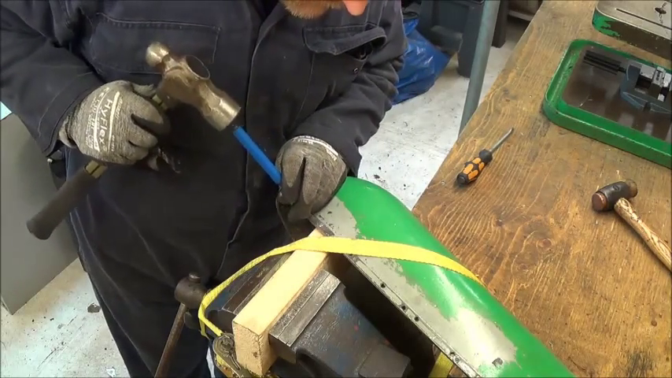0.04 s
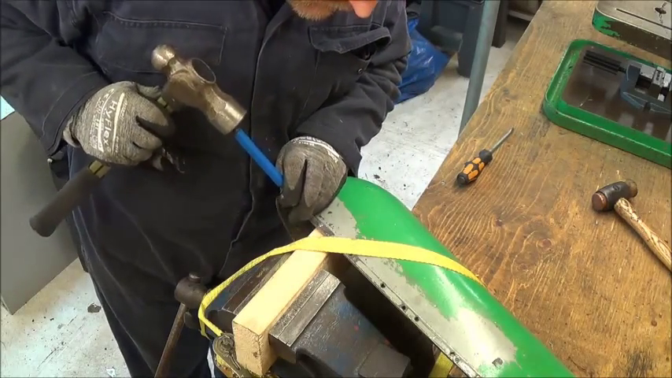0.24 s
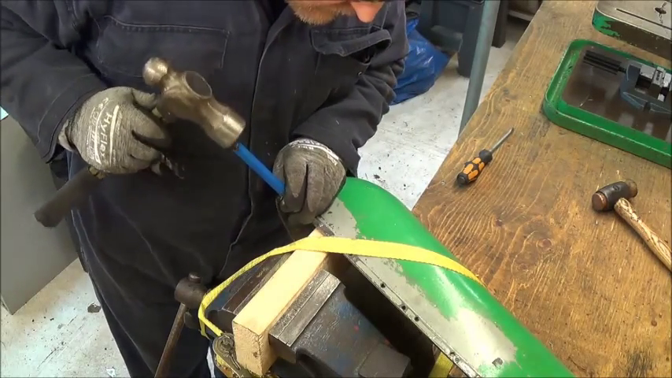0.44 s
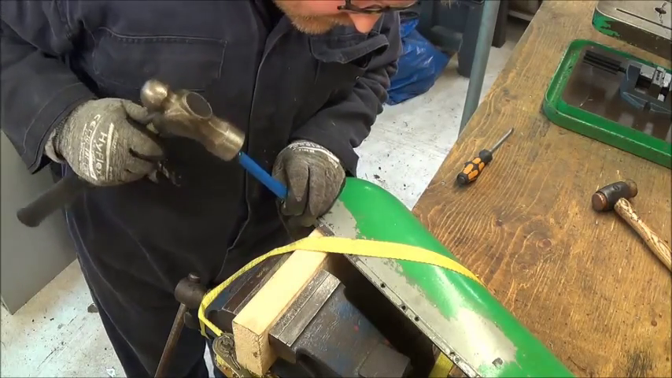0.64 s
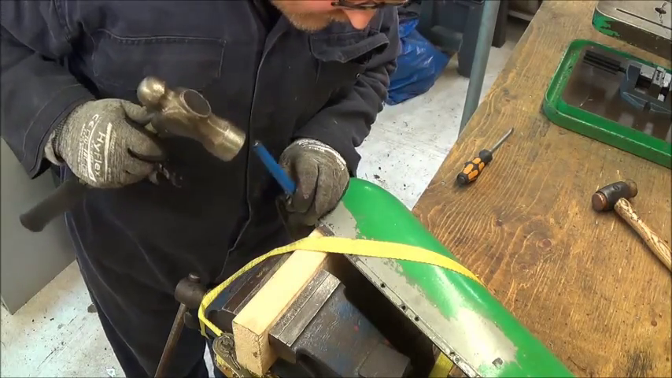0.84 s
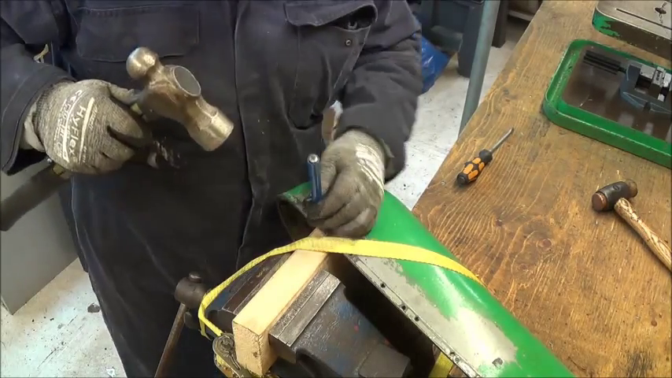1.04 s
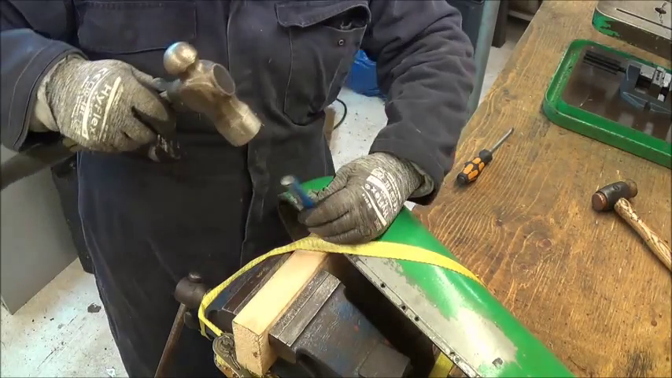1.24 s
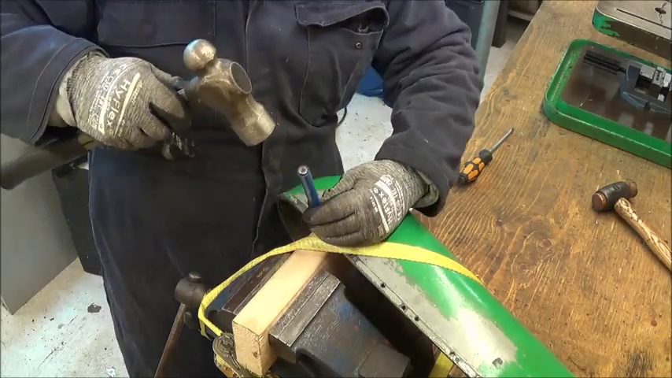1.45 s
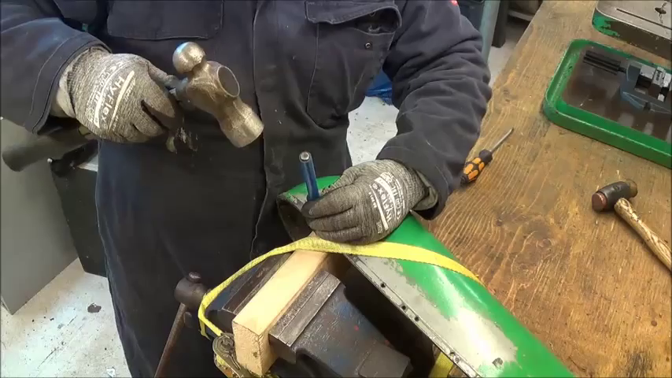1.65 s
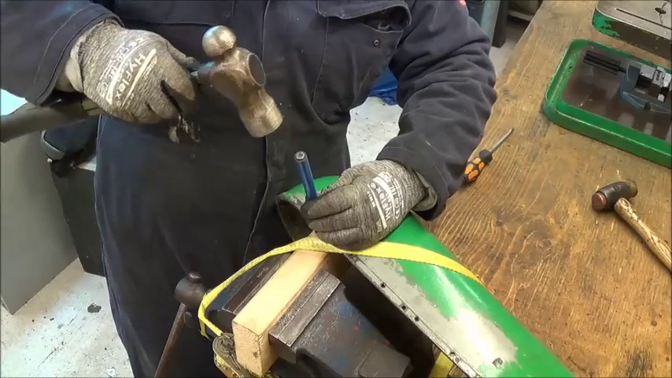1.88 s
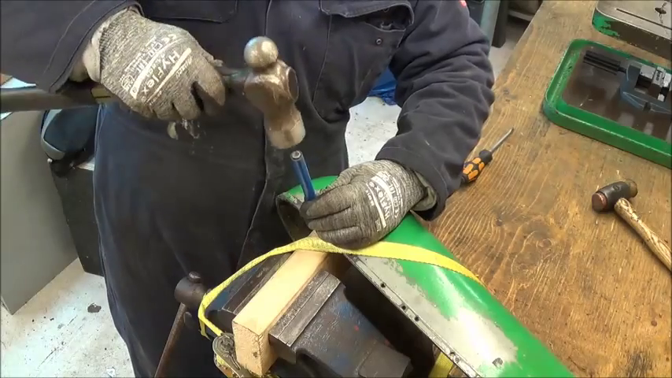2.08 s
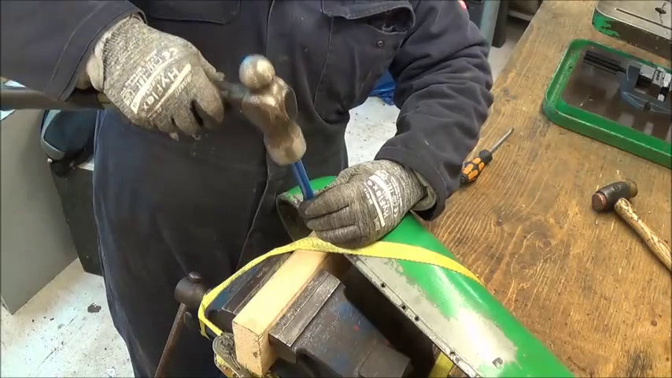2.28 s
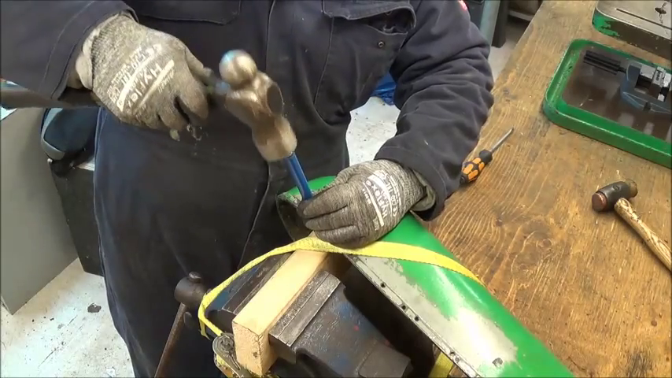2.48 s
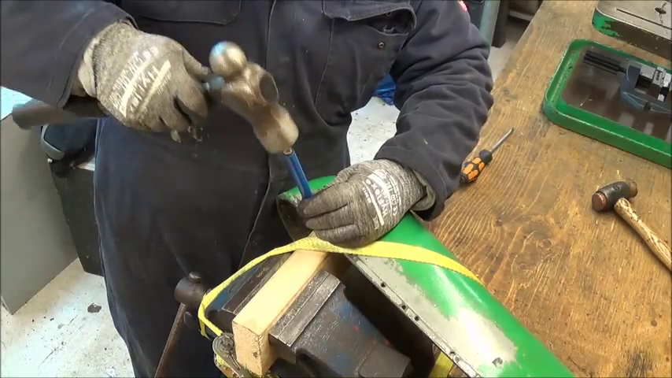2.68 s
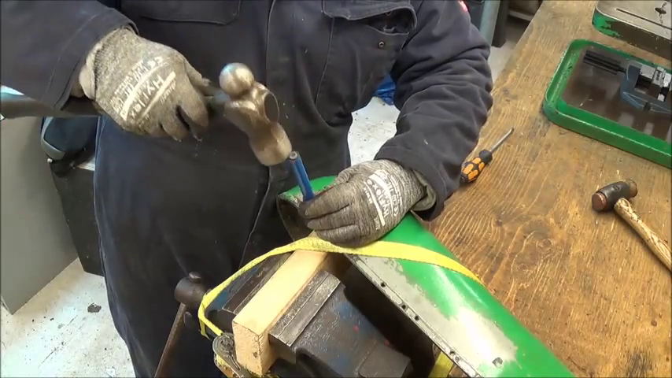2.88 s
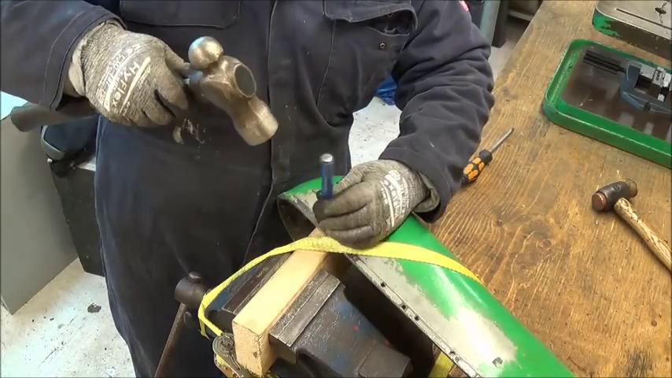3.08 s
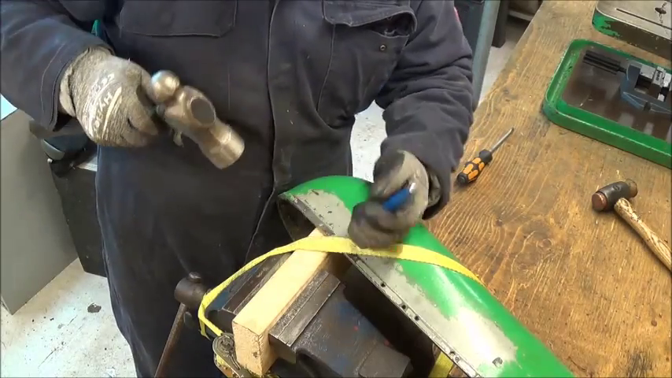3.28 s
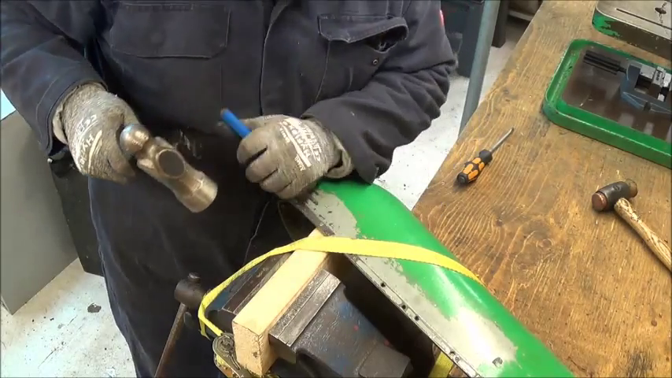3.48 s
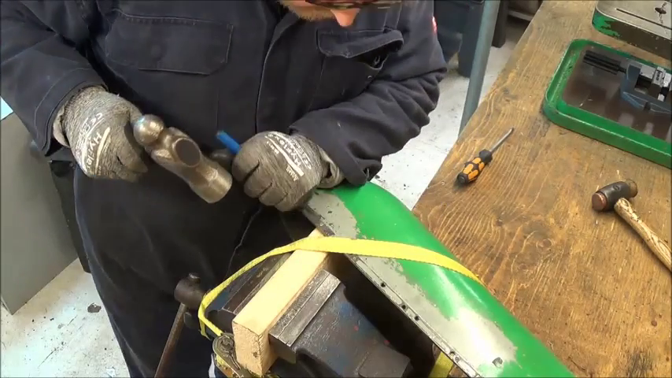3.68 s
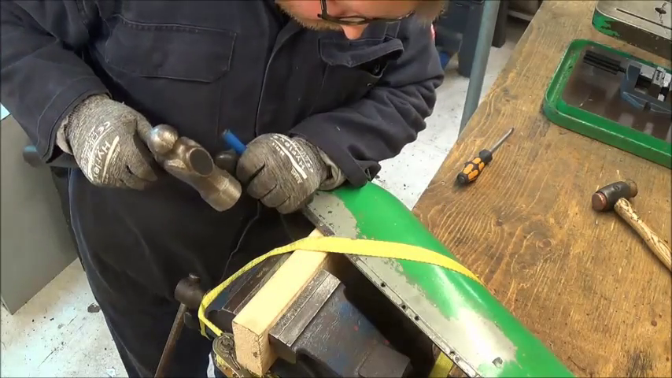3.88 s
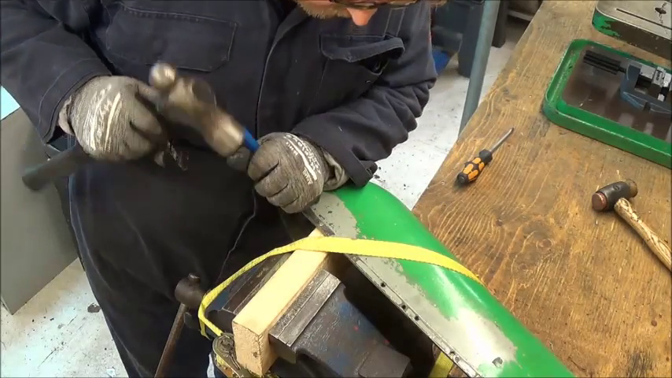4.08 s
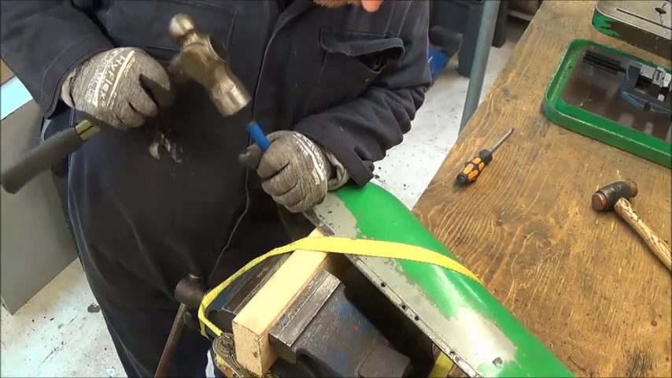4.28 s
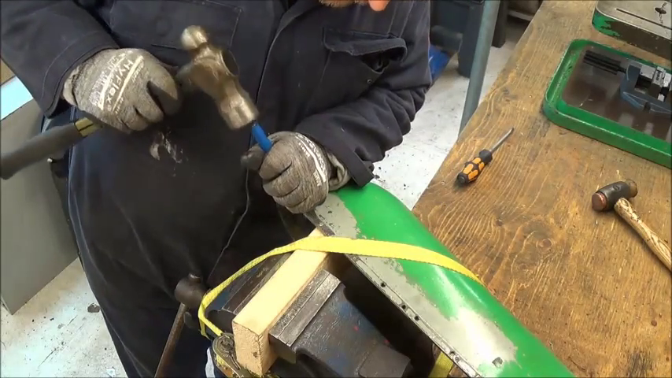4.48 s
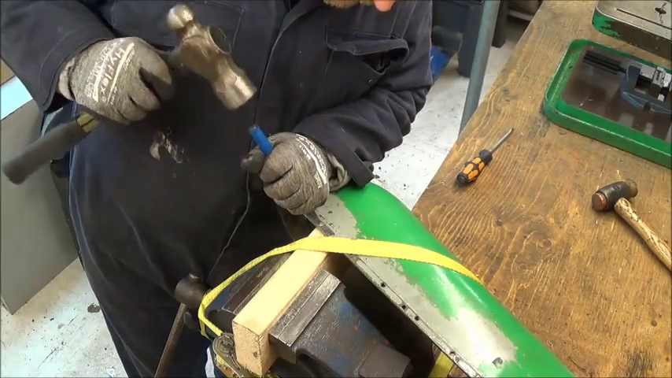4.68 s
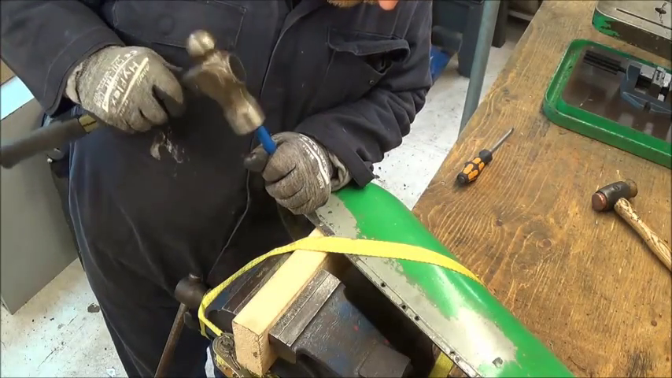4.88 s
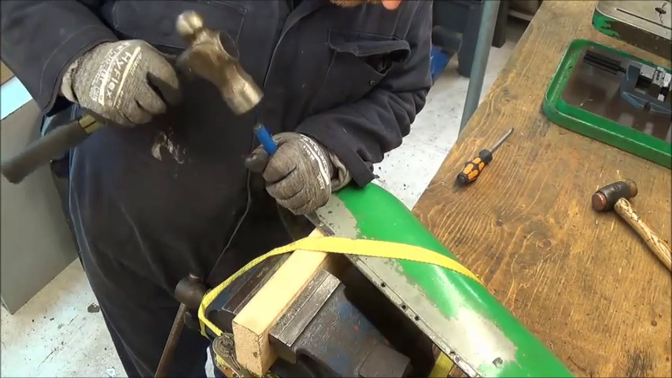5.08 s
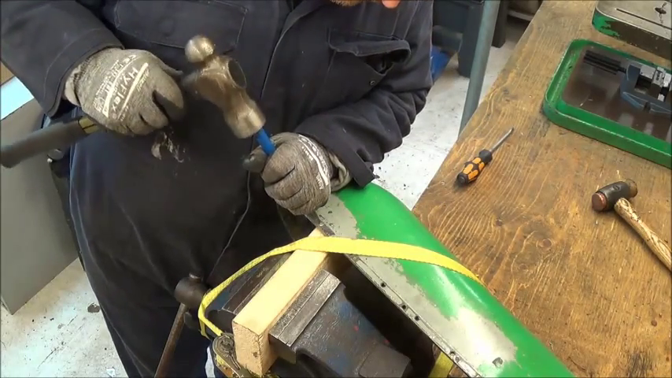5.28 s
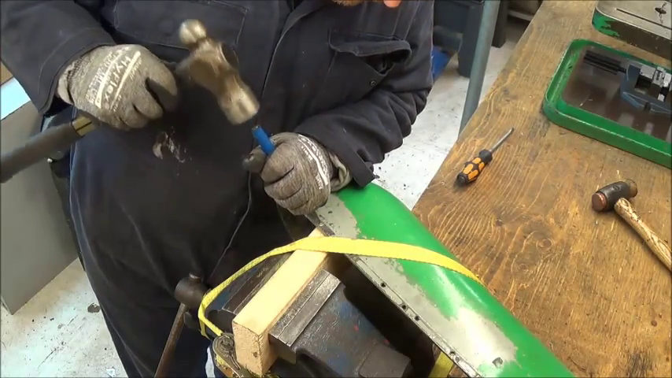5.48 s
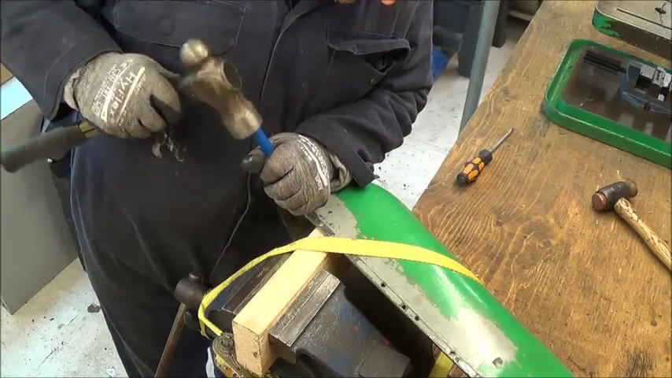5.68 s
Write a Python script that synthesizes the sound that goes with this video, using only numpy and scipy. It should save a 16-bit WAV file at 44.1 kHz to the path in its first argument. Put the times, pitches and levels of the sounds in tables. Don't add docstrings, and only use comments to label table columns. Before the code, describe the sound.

A small hammer strikes a steel punch on a metal casing in three sharp ringing runs, with loose clanks and skids between, in a small workshop.

```python
import sys
import numpy as np
from scipy import signal
from scipy.fft import rfft, irfft
from scipy.io import wavfile
from scipy.ndimage import uniform_filter1d, minimum_filter1d

SR = 44100
rng = np.random.default_rng(int(sys.argv[2]) if len(sys.argv) > 2 else 0)


def put_to_file(sound):
    columns = np.atleast_2d(sound).T
    safe = np.clip(columns, -1, 1)
    whole_steps = np.round(safe * 32767)
    wavfile.write(sys.argv[1], SR, whole_steps.astype(np.int16))


def nominal_scale(level):
    x = np.asarray(level, float) / 20
    return 10 ** x


N = 253134
RING_SAMPLES = 9000

# [f/Hz, density/dB per Hz]
HISS_SPECTRUM = [(20, -21), (45, -22), (95, 1), (150, -11.5), (250, -5.5), (500, 2), (1000, -3), (1700, 3),
                 (2600, -1), (4000, -2.5), (9000, -4.5), (14500, -7.5), (16500, -7)]
# [f/Hz, density/dB per Hz]
RUSTLE_SPECTRUM = [(200, 4), (800, 9.5), (2000, 5.5), (4300, 7), (6500, 0), (12000, 0)]
# [t/s, level/dB]
RUSTLE_LEVEL = [(0, -51), (.3, -73), (1.0, -58.5), (1.25, -60.5), (1.55, -53), (2.1, -57.5), (3.2, -57.5),
                (3.3, -60.5), (3.65, -63.5), (3.75, -55.5), (4.3, -56), (5.74, -63)]
# [f/Hz, level/dB rms]
HUM_TONES = [(199.2, -80.5)]
# [f/Hz, side re mid/dB]
SIDE_LEVEL = [(100, -27), (300, -35), (600, -11), (1500, -7.5), (5000, -8), (12000, -10)]
# [f/Hz, t60/s]
SHOP_T60 = [(150, 0.26), (500, 0.21), (1500, 0.12), (5000, 0.18), (15000, 0.057)]
# [f/Hz, t60/s]
DENSE_T60 = [(150, 0.34), (400, 0.19), (1000, 0.14), (2800, 0.11), (7000, 0.091), (15000, 0.094)]
# [f/Hz, density/dB per Hz]
KNOCK_SPECTRUM = [(100, -76), (300, -17.5), (700, -11.5), (1000, -6.5), (1300, 10.5), (1600, -9.5),
                  (2300, 4), (3200, -9), (4500, -3), (6000, -11.5), (9400, -21), (16000, -30)]
# [f/Hz, level/dB, t60/s]
LOOSE_MODES = [(440.4, -33, 0.57), (772, -21.5, 0.2), (994.4, 5.5, 0.056), (1204, -2, 0.059),
               (1720, 2, 0.084), (2200, -6.5, 0.16), (2765, -24, 0.12), (2853, -4, 0.085),
               (3460, -2, 0.036), (4240, -11, 0.09), (4500, -9, 0.14), (5450, -2.5, 0.026),
               (5760, -1.5, 0.037), (6470, 3, 0.019), (7340, -8, 0.069), (8480, -8, 0.033),
               (9430, -12, 0.077), (10900, -35, 0.14)]
# [t/s, peak/dB, tilt/dB per octave, chatter/ms]
KNOCKS = [(0.013, -12.5, 3, 14), (0.156, -19.5, 0.5, 13), (0.992, -30.5, 2.5, 3.6),
          (1.154, -54.5, -10, 7.4), (1.257, -1.5, 3.5, 25.3), (1.266, -2.5, 0.5, 14.5),
          (1.346, -18, 3.5, 3.8), (1.561, -3, 2, 4.1), (1.606, -16.5, 1, 8.4), (1.853, -10, -2.5, 3.5),
          (1.926, -24, -0.5, 1.8), (3.13, -23, 2.5, 8.6), (3.34, -29.5, -1, 4.7), (3.821, -8.5, 3.5, 11),
          (4.038, -20.5, 2, 1.7)]
# [t/s, peak/dB, chatter/ms]
SKIDS = [(0.0, -24, 23), (0.068, -35, 6.8), (0.085, -27, 18), (0.121, -29.5, 21), (0.209, -32, 11),
         (0.231, -28.5, 7.1), (1.657, -25.5, 18), (1.768, -35, 8), (1.909, -22, 20.5), (3.904, -31, 25),
         (3.921, -27.5, 17), (3.943, -23, 16), (3.961, -27.5, 22)]
# [t/s, peak/dB]
TICKS = [
    (1.092, -51),
    (1.635, -41),
    (3.236, -63),
    (3.5, -45),
    (3.641, -51),
    (3.72, -47.5),
]
# [t/s, peak/dB]
SLIPS = [
    (1.845, -54),
    (4.024, -50),
    (2.505, -38),
    (4.82, -28.5),
    (4.938, -37),
    (4.953, -45),
]
# [f/Hz, density/dB per Hz]
BLOW_SPECTRUM = [(100, -25.5), (160, -25), (220, -28.5), (300, -12), (450, -10), (800, -5.5), (1020, 1),
                 (1400, -4.5), (1950, 1.5), (3200, -2), (5000, -0.5), (7400, 3), (10000, 3.5),
                 (16000, -2.5)]
# [f/Hz, level/dB, t60/s]
DRIVEN_MODES = [(431, -24, .5), (480, -21, .18), (670, -17, .1), (780, -15, .09), (1000, -2, .06),
                (1050, -6, .07), (1270, -12, .1), (1720, -11, .11), (1914, -9, .09), (2260, -10, .1),
                (2985, -11, .1), (3772, -8, .12), (4279, -8, .12), (4767, -9, .1), (5097, -8, .1),
                (5295, -9, .1), (5790, -5, .14), (6440, -6, .1), (6635, -4, .11), (7181, -2, .1),
                (7457, -1, .11), (8226, -4, .1), (8900, -6, .1), (9340, -3, .1), (9800, -6, .1),
                (10187, -7, .1), (12634, -6, .09), (14104, -7, .08)]
# [t/s, clear ring level/dB]
BLOWS = [(0.578, -6.5), (0.704, -1.5), (0.826, -6), (2.263, -4), (2.392, -9), (2.527, -4), (2.666, -4.5),
         (2.808, -8), (2.954, -8), (4.298, -10.5), (4.431, -3.5), (4.558, -1.5), (4.69, -3), (4.828, -5.5),
         (4.959, -9), (5.091, -6), (5.229, -9.5), (5.371, -5), (5.511, -8), (5.645, -6)]
# [start t/s, clatter/dB, tilt/dB per octave, top edge at first blow f/Hz, shelf above edge/dB]
RUNS = [
    (0.5, -5.5, 1.05, 8250, -12),
    (2.2, -2.5, 1.12, 8280, -11.5),
    (4.2, -3.5, 0.95, 9250, -9.5),
]


def at_hz(points, hz):
    table_hz, value = np.array(points)[:, 0], np.array(points)[:, 1]
    return np.interp(np.log(hz), np.log(table_hz), value)


def rms_one(x):
    return x / np.sqrt(np.mean(x ** 2) + 1e-20)


def left_right(mid, side):
    return np.array([mid + side, mid - side])


def decay(t_s, t60_s):
    return np.exp(-np.log(1000) * t_s / t60_s)


def coloured(spectrum, size):
    hz = np.maximum(np.fft.rfftfreq(size, 1 / SR), 10)
    mid, side = rfft(rng.standard_normal((2, size))) * nominal_scale(at_hz(spectrum, hz))
    side = side * nominal_scale(at_hz(SIDE_LEVEL, hz))
    return rms_one(irfft(left_right(mid, side), size))


def background():
    t = np.arange(N) / SR
    hiss = nominal_scale(-59.5) * coloured(HISS_SPECTRUM, N)
    rustle = nominal_scale(np.interp(t, *np.transpose(RUSTLE_LEVEL))) * coloured(RUSTLE_SPECTRUM, N)
    hum = sum(np.sqrt(2) * nominal_scale(db) * np.sin(2 * np.pi * hz * t) for hz, db in HUM_TONES)
    return hiss + rustle + hum


def workshop(x, gap_ms):
    t, tail = np.arange(RING_SAMPLES) / SR, 0
    for low_hz in 62.5 * 2.0 ** np.arange(8):
        band = signal.butter(2, [low_hz, 2 * low_hz], "band", fs=SR, output="sos")
        mid, side = signal.sosfilt(band, rng.standard_normal((2, RING_SAMPLES)))
        fade = decay(t, at_hz(SHOP_T60, 0.81 * low_hz))
        tail = tail + fade * left_right(mid, 0.4 * side)
    tail = tail * (1 - np.exp(-t * 1000 / gap_ms))
    tail = tail / np.sqrt(np.sum(tail ** 2) / 2)
    return signal.fftconvolve(x.mean(0)[None], tail, axes=1)[:, :N]


def dense_modes(spectrum, count):
    width_hz, relief_db, relief_from_hz = 24, 6, 1500
    size = 6 * RING_SAMPLES
    band_hz = np.linspace(3.4, 18.2, count) ** (10 / 3)
    whole = rfft(coloured(spectrum, size))
    chance = uniform_filter1d(np.angle(whole[0, ::-1]), round(width_hz * size / SR))
    relief = rms_one(nominal_scale(relief_db * np.tanh(rms_one(chance))))
    upper = np.arange(len(relief)) > relief_from_hz * size / SR
    whole = whole * np.where(upper, relief, 1)
    bin_hz = np.fft.rfftfreq(size, 1 / SR)
    place = np.interp(np.log(bin_hz + 1), np.log(band_hz), np.arange(count))
    bands = [irfft(whole * np.maximum(1 - abs(place - k), 0), size) for k in range(count)]
    return band_hz, np.array(bands)


def clear_modes(modes, level_db):
    hz, mode_db, t60_s = np.transpose(modes)[:, :, None]
    t = np.arange(RING_SAMPLES) / SR
    fade = nominal_scale(mode_db + level_db) * decay(t, t60_s)
    skew = rng.uniform(0, 2 * np.pi, hz.shape)
    mid = np.sin(2 * np.pi * hz * t)
    side = nominal_scale(at_hz(SIDE_LEVEL, hz)) * np.sin(2 * np.pi * hz * t + skew)
    return hz[:, 0], fade * left_right(mid, side)


def waver(count, hz):
    slow = signal.butter(2, hz, fs=SR, output="sos")
    return rms_one(signal.sosfilt(slow, rng.standard_normal((count, 6 * RING_SAMPLES))))


def contacts(events, spectrum, modes, modes_db, damped, alike, rough, vary_db, gain_db):
    band_hz, stock = dense_modes(spectrum, count=40)
    mode_hz, rings = clear_modes(modes, modes_db)
    swings = waver(count=len(modes), hz=25)
    bands, hz = len(band_hz), np.r_[band_hz, mode_hz][:, None]
    t, out = np.arange(RING_SAMPLES) / SR, np.zeros((2, N + 2 * RING_SAMPLES))
    dense_t60_s = 1 / (damped * at_hz(DENSE_T60, band_hz))[:, None]
    dense_t60_s = (at_hz(DENSE_T60, band_hz) ** 2)[:, None] * dense_t60_s * damped ** 2
    luck_db = vary_db * rng.standard_normal((len(events), len(hz)))
    offsets = rng.integers(RING_SAMPLES, 5 * RING_SAMPLES, len(events))
    for k, (start_s, peak_db, clatter_db, tilt, chatter_ms, edge_hz, shelf_db) in enumerate(events):
        chatter_s = max(chatter_ms, .05) / 1000
        fresh = slice(offsets[k], offsets[k] + RING_SAMPLES)
        rise = np.tanh(t / (0.28 * chatter_s + 4.34 / hz))
        above_edge = np.clip((hz - edge_hz) / 600 + .5, 0, 1)
        gain = nominal_scale(luck_db[k, :, None] + tilt * np.log2(hz / 3000) + shelf_db * above_edge) * rise
        fade = nominal_scale(clatter_db) * gain[:bands] * decay(np.maximum(t - chatter_s, 0), dense_t60_s)
        noise = np.sqrt(alike) * stock[..., :RING_SAMPLES] + np.sqrt(1 - alike) * stock[..., fresh]
        dense = np.einsum("bt,bct->ct", fade, noise)
        clear = np.einsum("mt,cmt->ct", gain[bands:] * (1 + rough * swings[:, fresh]), rings)
        start = round(start_s * SR)
        out[:, start:start + RING_SAMPLES] += nominal_scale(peak_db + gain_db) * (dense + clear)
    return out[:, :N]


def handling():
    rows = [(s, db, -2, tilt, ms) for s, db, tilt, ms in KNOCKS]
    rows += [(s, db, -2.5, -1, ms) for s, db, ms in SKIDS]
    rows += [(s, db, 2, 9, 6) for s, db in TICKS]
    slips = [(s, db, 13, 8.5, 44) for s, db in SLIPS]
    return [(*row, 0, 0) for row in sorted(rows) + slips]


def crack(events):
    pulse_db, pulse_hz, pulse_ms = 15, 6500, 0.1
    t, out = np.arange(-20, 21) / SR, np.zeros(N)
    pulse = np.sin(2 * np.pi * pulse_hz * t) * np.exp(-(t * 1000 / pulse_ms) ** 2)
    for start_s, ring_db, clatter_db, *_ in events:
        start = round(start_s * SR)
        out[start:start + len(t)] += nominal_scale(pulse_db + ring_db + clatter_db) * pulse
    return out


def hammer():
    seating_hz, seating_blows = 1230, 0.5
    first_blow_db, chatter_ms = -0.5, 0.43
    rows, starts = [], [run[0] for run in RUNS]
    for s, ring_db in BLOWS:
        run_s, clatter_db, tilt, edge_hz, shelf_db = RUNS[np.searchsorted(starts, s) - 1]
        earlier = sum(run_s < other < s for other, _ in BLOWS)
        edge_hz = edge_hz + seating_hz * (1 - np.exp(-earlier / seating_blows))
        force_db = clatter_db + first_blow_db * (earlier == 0)
        rows.append((s, ring_db, force_db - ring_db, tilt, chatter_ms, edge_hz, shelf_db))
    return rows


def scene():
    knocks = contacts(handling(), KNOCK_SPECTRUM, LOOSE_MODES, modes_db=-5, damped=0.59,
                      alike=0.82, rough=.45, vary_db=3.0, gain_db=-10.0)
    blows = contacts(hammer(), BLOW_SPECTRUM, DRIVEN_MODES, modes_db=-10.5, damped=1.157,
                     alike=0.65, rough=.45, vary_db=1.1, gain_db=5.5)
    metal = (blows + crack(hammer()) + knocks) * nominal_scale([[-.7], [.7]])
    return metal + nominal_scale(-18) * workshop(metal, gap_ms=25) + background()


def limiter(x, ceiling_db, release_db_s, smooth_ms):
    width = max(int(smooth_ms * SR / 1000), 2)
    level_db = 10 * np.log10(uniform_filter1d(np.max(x ** 2, axis=0), width) + 1e-12)
    climb_db = release_db_s * np.arange(N) / SR
    excess_db = np.maximum(level_db - ceiling_db, 0)
    held_db = np.maximum.accumulate(excess_db + climb_db) - climb_db
    cut_db = -minimum_filter1d(-held_db, width)
    return x * nominal_scale(-uniform_filter1d(cut_db, width))


def roll_off(x):
    return signal.sosfilt(signal.butter(12, 16750, fs=SR, output="sos"), x)


def record(dry):
    held = np.clip(limiter(dry, ceiling_db=-8.5, release_db_s=703, smooth_ms=0.8), -1, 1)
    rumble_cut = signal.butter(2, 60, "high", fs=SR, output="sos")
    top_cut = signal.cheby2(10, 45, 16700, fs=SR, output="sos")
    mix = signal.sosfilt(top_cut, signal.sosfilt(rumble_cut, held))
    return roll_off(mix)


dry = scene()
out = record(dry)
put_to_file(out)
```